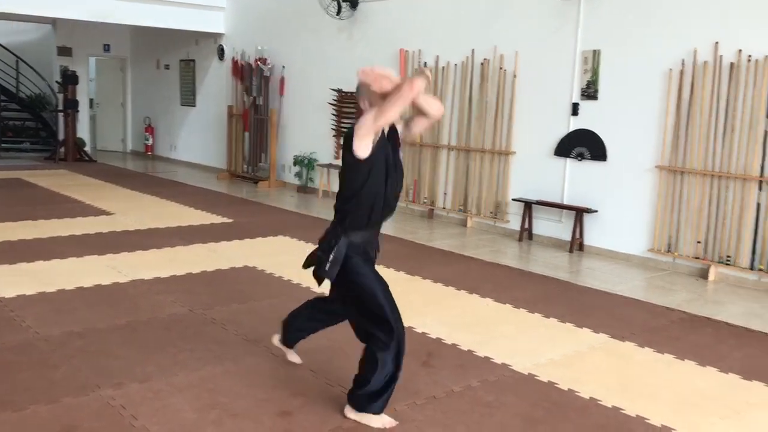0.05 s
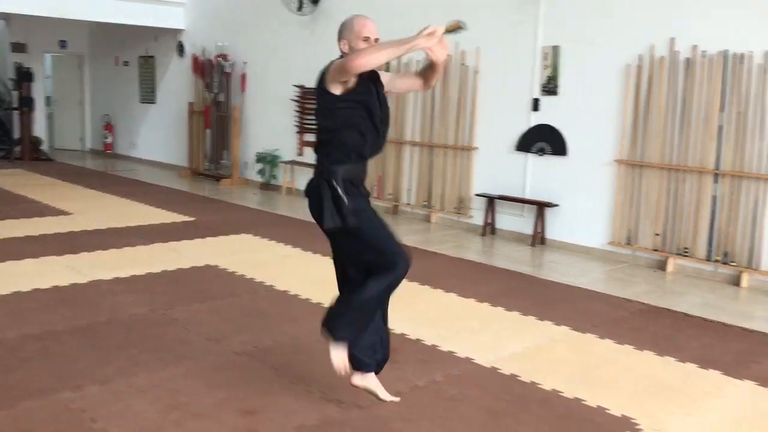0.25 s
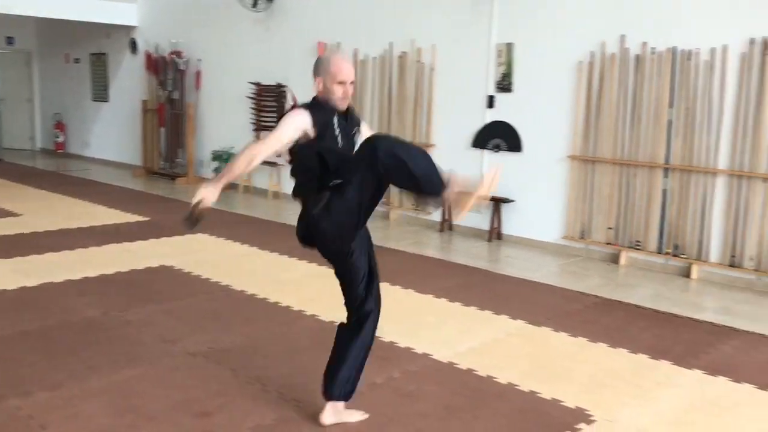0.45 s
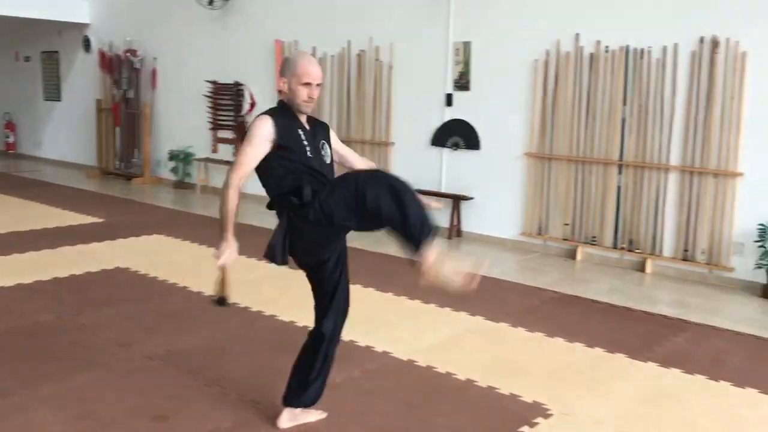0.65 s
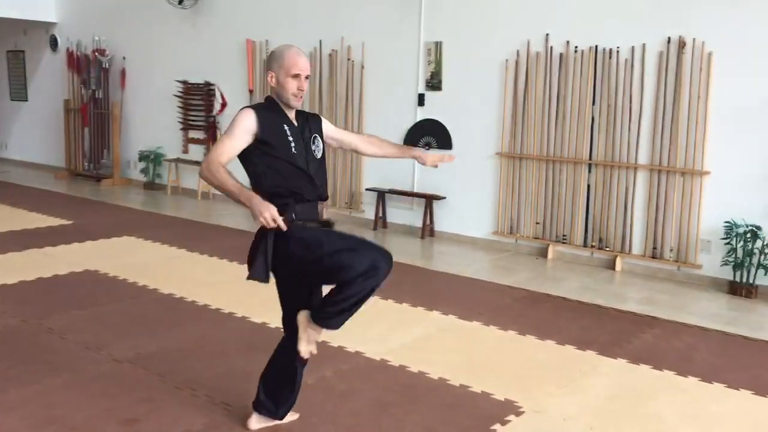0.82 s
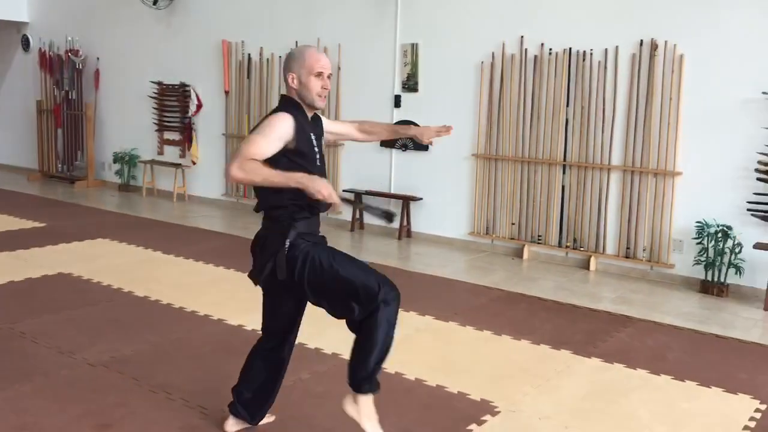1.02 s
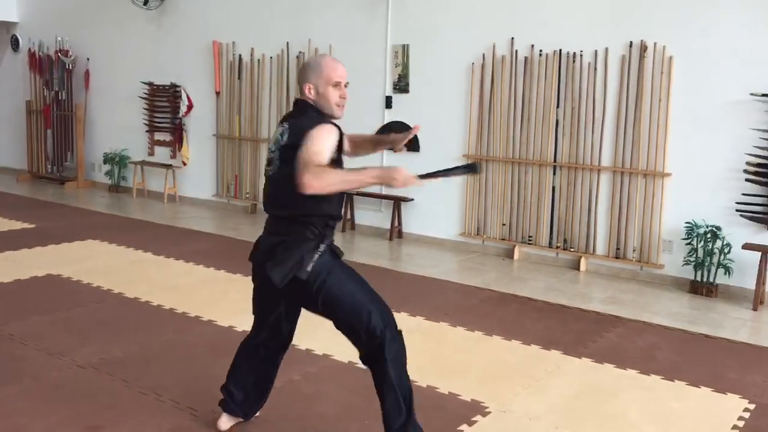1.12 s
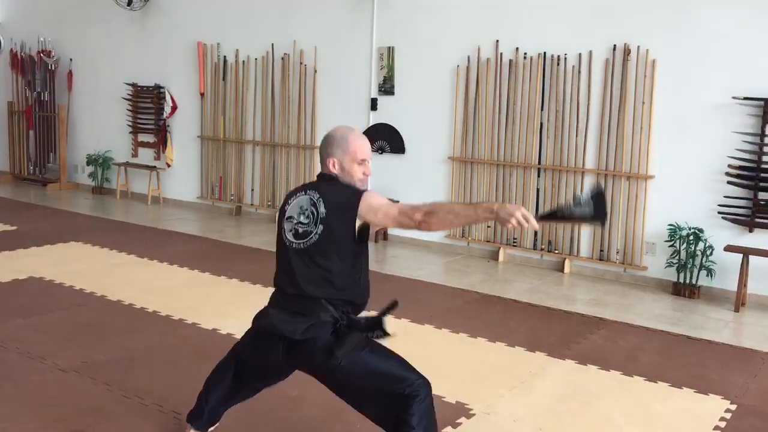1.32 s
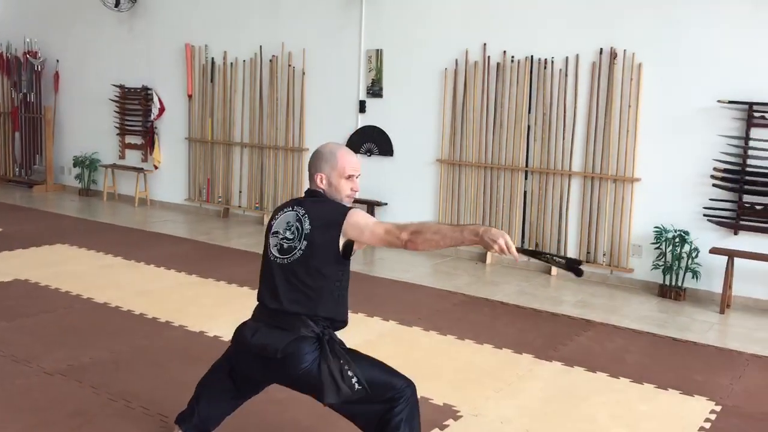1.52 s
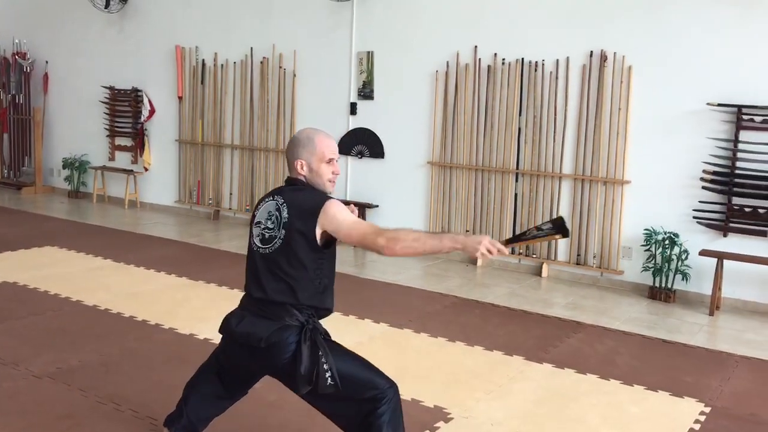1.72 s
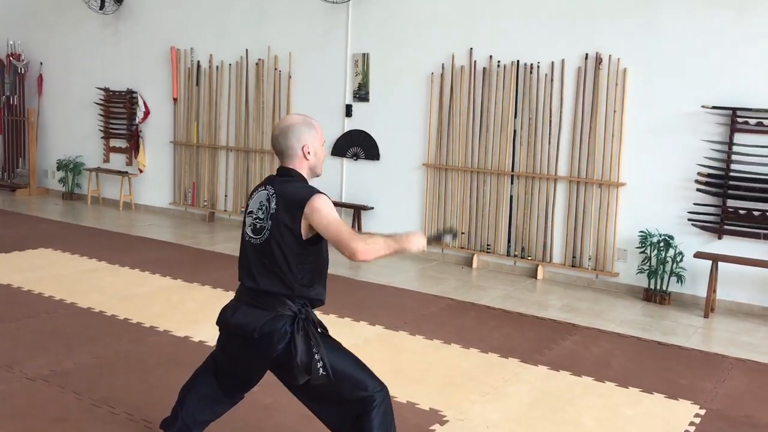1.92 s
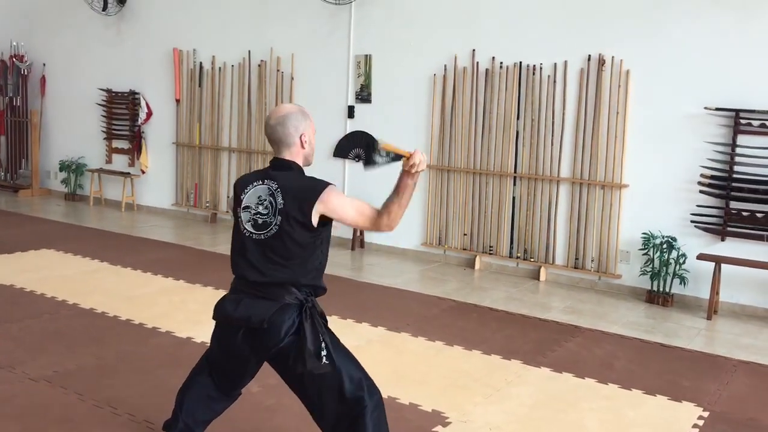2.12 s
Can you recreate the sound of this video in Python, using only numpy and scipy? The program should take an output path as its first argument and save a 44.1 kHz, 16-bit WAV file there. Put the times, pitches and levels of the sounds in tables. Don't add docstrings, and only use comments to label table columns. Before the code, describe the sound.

Single crisp clack of a hand fan flicked open, after faint knocks and scuffs, long bright reverberation

```python
import sys
import numpy as np
from scipy import signal
from scipy.io import wavfile
from scipy.ndimage import uniform_filter1d

SR = 44100
rng = np.random.default_rng(int(sys.argv[2]) if len(sys.argv) > 2 else 0)


def log_audio(samples):
    frames = np.atleast_2d(samples).T
    limited = np.clip(frames, -1, 1)
    pcm = np.round(limited * 32767).astype(np.int16)
    wavfile.write(sys.argv[1], SR, pcm)


def level_to_linear(level):
    exponent = np.asarray(level, float) / 20
    return 10 ** exponent


N = 94815
T = np.arange(N) / SR


def unit(x):
    return x / np.sqrt(np.mean(x ** 2))


def noise():
    return rng.standard_normal(N)


def band(x, hz, width_hz):
    centre_hz = min(hz, .45 * SR)
    q = max(hz / width_hz, .3)
    return signal.lfilter(*signal.iirpeak(centre_hz, q, fs=SR), x)


def third_octave_noise(hz):
    return band(band(noise(), hz, hz / 3), hz, hz / 3)


def walk(rate):
    hold = int(SR / rate)
    steps = np.repeat(rng.standard_normal(N // hold + 1), hold)
    return 1.29 * uniform_filter1d(uniform_filter1d(steps, hold), hold)[:N]


def ring(at, hz, t60):
    t = np.clip(T - at, 0, None)
    return np.sin(2 * np.pi * hz * t) * level_to_linear(np.maximum(-60 * t / max(t60, .0005), -200))


def swell(at, rise, fall):
    t = T - at
    up = np.sin(np.pi / 2 * np.clip(t / rise, 0, 1)) ** 2
    return up * np.exp(-np.clip(t - rise, 0, None) / fall)


def grainy(grain_db):
    grains = np.repeat(rng.exponential(1, N // 40 + 1), 40)[:N]
    return unit(noise() * level_to_linear(grain_db * grains))


# time in seconds, level in dB, brightness in dB per octave.
CLACKS = [
    (1.39150, -4.5, 3),
    (1.3987, -11, -5),
    (1.3984, -9, -1.5),
    (1.39955, -5, -1),
    (1.3997, -12, 0),
    (1.3997, -13, -2),
]
# frequency in Hz, level in dB, t60 in seconds.
RIB_MODES = [
    (1790, -14.5, 0.0066),
    (4100, -2.5, 0.0019),
    (7150, -5.5, 0.0015),
    (10900, -12.5, 0.0013),
    (15500, -12.5, 0.0012),
]


def fan():
    ribs = 0
    for at, db, tilt_db in CLACKS:
        for hz, mode_db, t60 in RIB_MODES:
            tilt = tilt_db * np.log2(hz / 4000)
            ribs = ribs + level_to_linear(db + mode_db + tilt) * ring(at, hz, t60)
    crackle_t60_s = .008
    tension = swell(1.3986, 0.00094, crackle_t60_s / np.log(1000))
    return ribs + level_to_linear(-16) * tension * unit(band(noise(), 5200, 12000))


# time
# in seconds, level in dB, frequency in Hz, t60 in seconds, tick level in dB.
KNOCKS = [(.108, -37.5, 1650, .008, -56), (.2845, -42, 600, .02, -66), (.2865, -41, 2010, 0.017, -54),
          (.4793, -34, 660, 0.0099, -47), (0.44, -44, 2100, 0.011, -66), (.4804, -32, 1350, .012, -52),
          (1.192, -43, 1800, 0.01, -64), (1.2935, -34.5, 947, .025, -68), (1.2968, -31, 1040, .014, -48),
          (1.322, -39, 900, .02, -68), (1.3432, -28, 800, 0.0067, -52), (1.3455, -34, 1300, 0.014, -48),
          (1.3597, -26, 1530, 0.009, -46), (1.371, -32.5, 677, 0.023, -62), (1.372, -32, 110, .08, -68)]


def knocks():
    tick = unit(band(noise(), 4300, 7800))
    push_s = 0.00025
    out = 0
    for at, db, hz, t60, tick_db in KNOCKS:
        out = out + level_to_linear(db) * ring(at, hz, t60) * swell(at, push_s, 9)
        out = out + level_to_linear(tick_db) * swell(at, .0004, .001) * tick
    return out


# start in seconds, rise in seconds, fall in seconds, level in dB, centre in Hz.
RUSTLES = [(0.069, 0.023, 0.064, -60.5, 11000), (.104, 0.004, 0.013, -53, 3970),
           (0.139, 0.039, 0.11, -58, 2860), (0.267, .01, 0.0048, -58.5, 10000),
           (.282, .005, 0.018, -55.5, 2500), (.33, 0.016, 0.013, -59, 11000),
           (.50, .01, 0.043, -62.5, 3180), (.495, .07, 0.031, -52, 890), (.2, 0.065, 0.16, -53.5, 715),
           (1.129, .04, 0.053, -72, 7800), (1.20, .02, 0.017, -66.5, 9000),
           (1.30, 0.024, 0.04, -52.5, 2010), (1.33, 0.028, 0.024, -53, 1000), (1.295, .04, .03, -66, 12000),
           (1.33, .02, 0.014, -52, 6000), (1.34, .01, .006, -60, 14000), (1.35, 0.017, 0.044, -49, 3900),
           (1.947, .012, 0.0043, -63, 14050), (2.09, .02, 0.048, -75, 14500)]


def rustles():
    cloth = grainy(2.5)
    out = 0
    for at, rise, fall, db, hz in RUSTLES:
        colour = unit(band(band(cloth, hz, 1.38 * hz), hz, 1.47 * hz))
        out = out + level_to_linear(db) * swell(at, rise, fall) * colour
    return out


# centre in Hz, width in Hz, level in dB.
SOLE_BANDS = [(2100, 1300, -2.5), (3560, 850, -3.5), (5400, 740, -2.5), (6640, 1500, -7.5),
              (9000, 3100, -5.5), (11900, 1900, -4), (15000, 2000, -13)]


def turning_sole():
    sole = unit(sum(level_to_linear(db) * unit(band(grainy(1.2), hz, width)) for hz, width, db in SOLE_BANDS))
    level_db = -49 + 1.1 * walk(30.5)
    return level_to_linear(level_db) * swell(0.566, rise=.06, fall=0.068) * sole


def mat_bounce(near):
    delay_s, level_db, mat_hz = .00355, -5.5, 12000
    return level_to_linear(level_db) * band(np.interp(T - delay_s, T, near), mat_hz * .5, mat_hz * 1.2)


# delay in seconds, level in dB, spread in seconds.
WALLS = [
    (.0055, -21, .003),
    (.0237, -4, .005),
    (.0335, -11, .005),
    (.043, -12, .005),
    (.0535, -8, .009),
]
# frequency in Hz, colour of the snap in dB, t60 in seconds.
HALL = [(300, -26, 1.8), (800, -6.5, 1.46), (1677, 5.5, 2.0), (2600, 4, 2.16), (4450, 7.5, 1.79),
        (6920, 4, 1.39), (11000, 1, 1.06), (15000, 3, 0.76)]


def hall(coloured):
    table_hz, colour_db, table_t60 = np.array(HALL).T
    echoes = sum(level_to_linear(db) * swell(at, 0.0011, spread) / np.sqrt(spread * SR / 2) for at, db, spread in WALLS)
    build = swell(.024, .022, 99)
    out = 0
    for hz in 250 * 2 ** np.arange(0, 6.1, 1 / 3):
        db = np.interp(np.log(hz), np.log(table_hz), colour_db)
        t60 = np.interp(np.log(hz), np.log(table_hz), table_t60)
        tail = level_to_linear(-32 - 60 * T / t60) * build
        out = out + level_to_linear(coloured * db) * np.hypot(echoes, tail) * third_octave_noise(hz)
    return out


# times in seconds, then levels in dB.
BURST_S = [
    1.3915,
    1.3989,
    -.25,
]
BURST_DB = [
    -11.5,
    -4.5,
    -22.5,
]


def reverberation(small):
    wet = sum(level_to_linear(db) * np.interp(T - at, T, hall(1)) for at, db in zip(BURST_S, BURST_DB))
    return wet + signal.fftconvolve(level_to_linear(-6.5) * small, hall(0))[:N]


# time in seconds, firing rate in Hz, level in dB.
ENGINE = [(0.0, 51, -41), (0.1, 55.1, -49.5), (0.39, 61.1, -51), (0.62, 61, -48), (0.74, 52.02, -44),
          (1.07, 51.66, -39), (1.13, 51.5, -54), (1.26, 51.75, -39.5), (1.76, 51.67, -52.5),
          (1.9, 57.4, -39.5), (1.99, 58.5, -59), (2.15, 61, -56)]
# time in seconds, frequency in Hz, level in dB.
DRONE = [(0, 99.5, -54), (.25, 100.3, -54), (.5, 112, -58.5), (1.1, 116, -56.5), (1.35, 114, -56),
         (1.65, 116.6, -53.5), (1.85, 115.6, -57), (2.15, 115, -61)]


def drone(table, rough):
    at, hz, db = np.array(table).T
    unsteady_hz = np.interp(T, at, hz) * (1 + rough * walk(12.1))
    phase = 2 * np.pi * np.cumsum(unsteady_hz) / SR
    return np.sqrt(2) * level_to_linear(np.interp(T, at, db)) * np.sin(phase)


# frequency in Hz, level in dB per Hz.
STREET = [(16, -30), (28, -9), (74, -8.5), (570, -33.5), (1070, -31), (2640, -44), (3620, -44),
          (15500, -76)]


def street():
    table_hz, density_db = np.array(STREET).T
    flicker_db = 1.0
    rumble = 0
    for hz in 32 * 2 ** np.arange(0, 9.1, 1 / 3):
        db = np.interp(np.log(hz), np.log(table_hz), density_db) + 10 * np.log10(hz)
        rumble = rumble + level_to_linear(db + flicker_db * walk(4.99)) * unit(third_octave_noise(hz))
    return level_to_linear(-44) * unit(rumble) + drone(ENGINE, rough=0.022) + drone(DRONE, rough=0.016)


def scene():
    rib_radiation = signal.butter(3, 1200, "high", fs=SR, output="sos")
    small = knocks() + rustles() + turning_sole()
    near = signal.sosfilt(rib_radiation, fan()) + small
    return (near + mat_bounce(near) + reverberation(small) + street())[None]


def band_limit(x):
    return signal.sosfilt(signal.butter(12, 16670, fs=SR, output="sos"), x)


def record(dry):
    dry = dry + level_to_linear(-78) * rng.standard_normal(dry.shape)
    dip_hz, dip_width_hz, dip_depth = 10520, 650, .4
    x = dry - dip_depth * band(dry, dip_hz, dip_width_hz)
    x = signal.sosfilt(signal.butter(4, 35.6, "high", fs=SR, output="sos"), x)
    x = signal.sosfiltfilt(signal.ellip(6, .1, 35, 15750, fs=SR, output="sos"), x)
    return band_limit(x)


dry = scene()
out = record(dry)
log_audio(out)
```